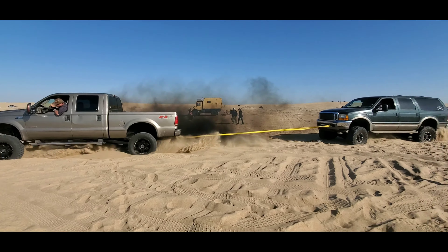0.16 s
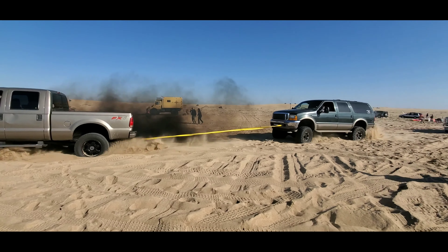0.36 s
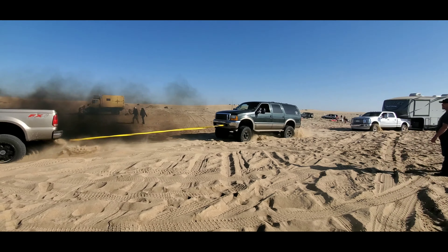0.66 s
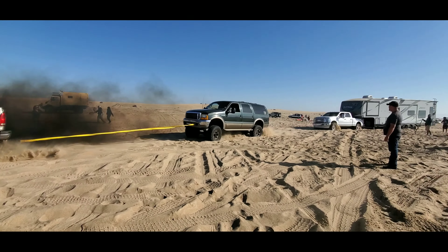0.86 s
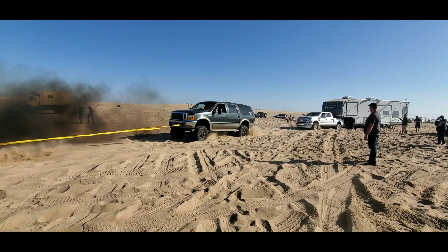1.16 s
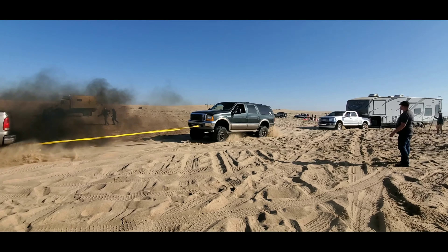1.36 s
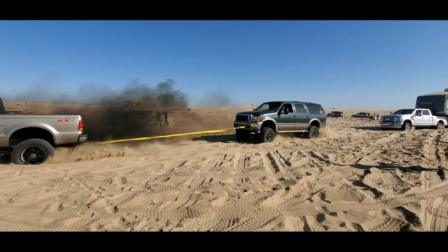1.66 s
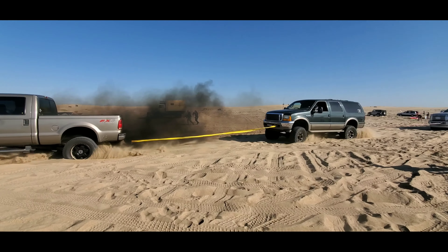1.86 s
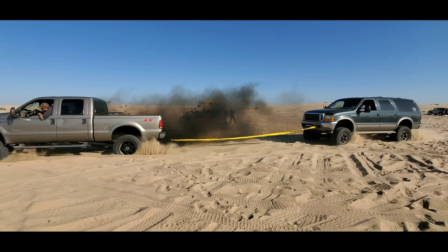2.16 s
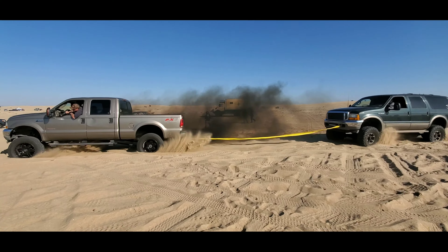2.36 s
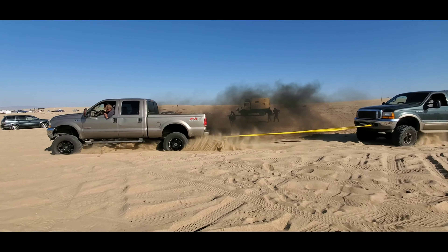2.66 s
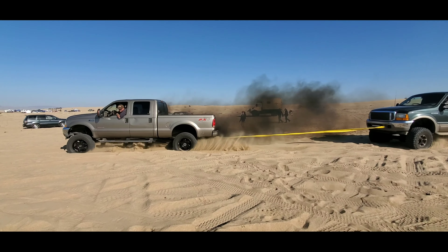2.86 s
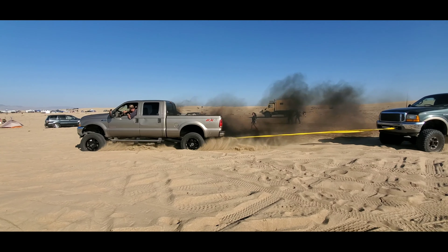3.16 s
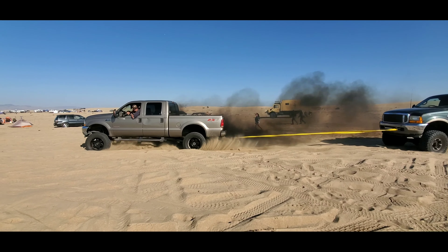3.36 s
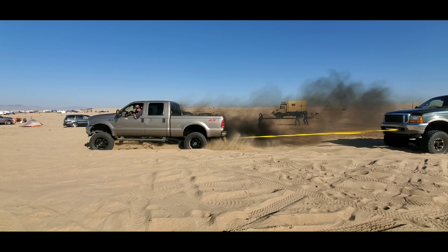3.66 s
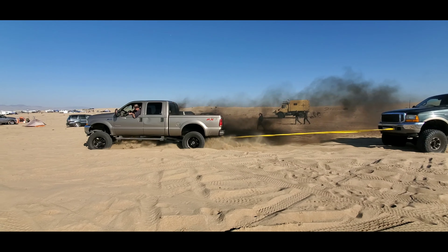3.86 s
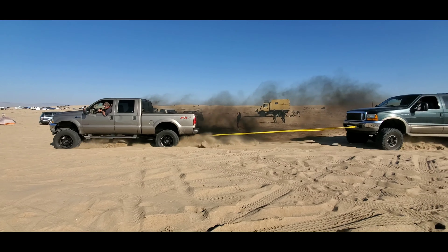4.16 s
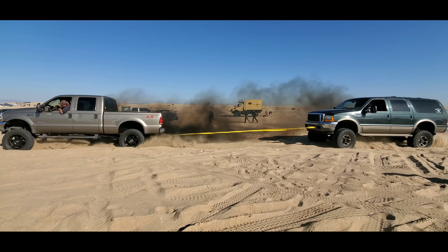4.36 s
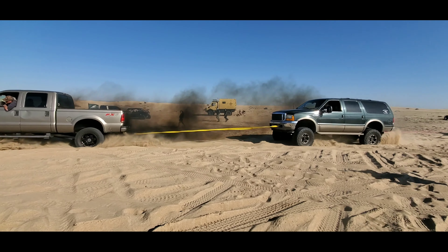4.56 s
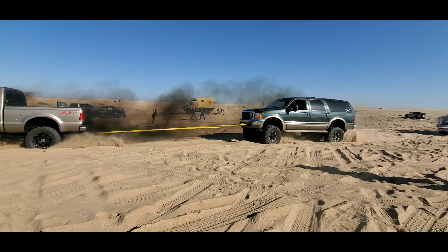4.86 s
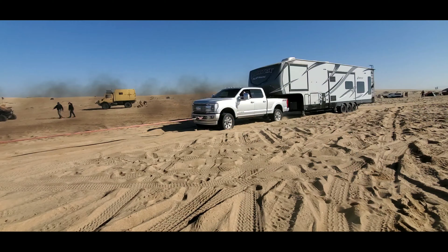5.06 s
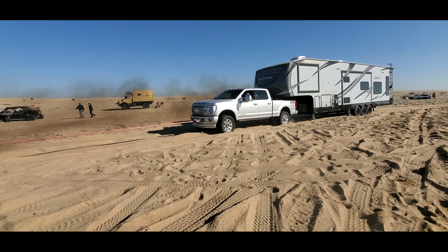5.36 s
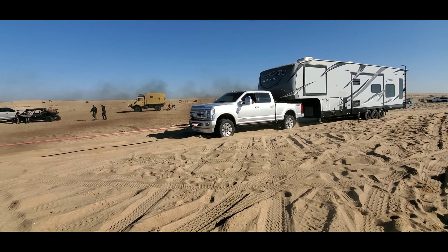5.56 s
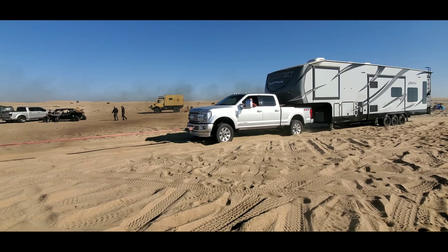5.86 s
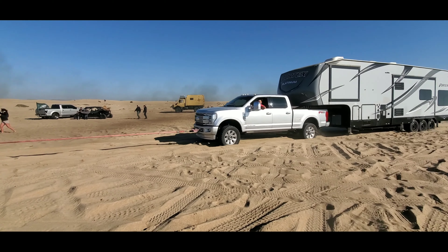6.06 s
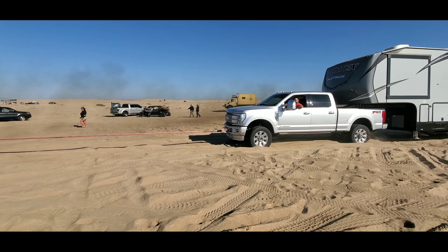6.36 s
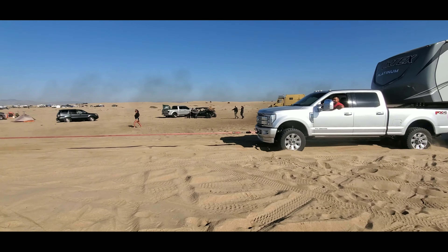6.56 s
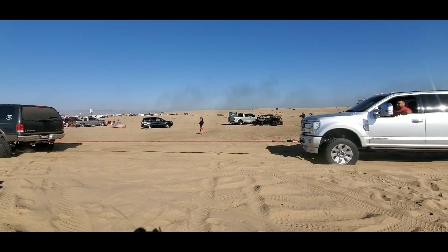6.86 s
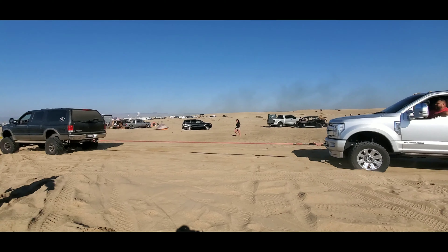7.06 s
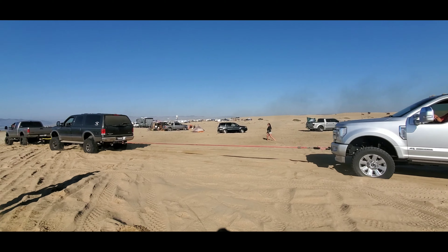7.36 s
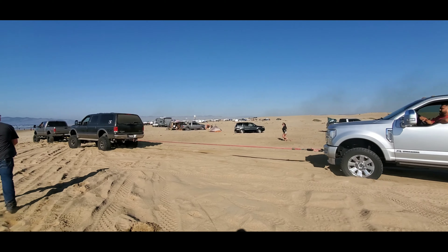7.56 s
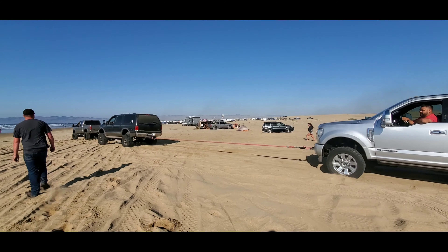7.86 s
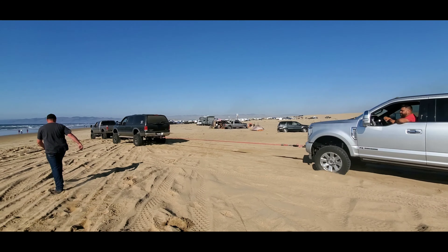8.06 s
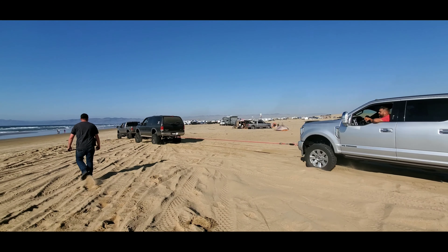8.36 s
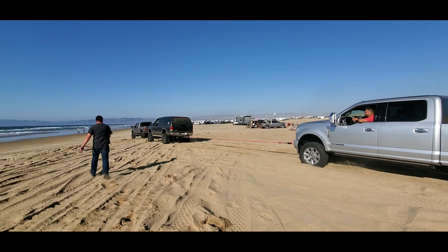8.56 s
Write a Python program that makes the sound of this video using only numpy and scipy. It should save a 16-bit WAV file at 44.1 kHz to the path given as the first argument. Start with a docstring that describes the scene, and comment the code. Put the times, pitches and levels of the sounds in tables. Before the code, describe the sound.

Outdoors with no room echo, a labouring diesel holds high revs, its buzzing exhaust note wavering and briefly dipping in strength near two seconds, with grainy clatter and sand noise. After five seconds a hard cut brings calm: deep wind buffets and snaps at the microphone, a faint wavering exhaust hum fades on the left, then a thin whistle, breathy downward swish and growing engine clatter on the right.

```python
"""A V8 diesel pickup revs hard on sand while towing, heard to the left of a panning hand-held phone.
Its harmonic orders, pulsed noise and ringing chuffs sound under filtered wind noise at the phone's two ports.
The sound cuts off, then a calmer scene fades in: gusts of lumpy noise, snaps and crackle on the ports,
a far truck's wavering two-partial drone and hiss that reach the left port first, and a nearer truck's clatter,
whistle and sliding breathy band, which rolls up on the right."""
import sys
import numpy as np
from scipy import signal
from scipy.fft import rfft, irfft, next_fast_len
from scipy.io import wavfile
from scipy.ndimage import uniform_filter1d, map_coordinates

SR = 44100
rng = np.random.default_rng(int(sys.argv[2]) if len(sys.argv) > 2 else 0)


def decibels_to_gain(level_db):
    """Convert a level in decibels to a linear amplitude gain (20 dB per decade)."""
    exponent = np.asarray(level_db, float) / 20
    return 10 ** exponent


def materialize(psi):
    """Save the field psi as 16-bit PCM at rate SR to the path in sys.argv[1].

    A 1-D psi becomes a single channel; in a 2-D psi each row is a channel.
    """
    bounded = np.clip(np.atleast_2d(psi).T, -1, 1)
    quanta = np.round(bounded * 32767).astype(np.int16)
    wavfile.write(sys.argv[1], SR, quanta)


N = 384552  # samples


# Engine speed and strength of the firing tone: time_s, cycle_rate_hz, firing_level_db
ENGINE_SPEED = [(0.0, 28.5, -15), (0.1, 27.5, -13), (0.24, 30.4, -17), (0.3, 30.7, -17), (0.51, 27.4, -11),
                (0.69, 31.3, -16), (0.92, 28.1, -13), (1.11, 30.7, -17), (1.3, 28.4, -10),
                (1.63, 30.5, -15), (1.77, 32.4, -16), (1.84, 32.5, -27), (2.0, 33.0, -25), (2.15, 28.3, -8),
                (2.35, 29.0, -11), (2.55, 28.1, -11), (2.75, 29.0, -14), (2.98, 28.3, -9),
                (3.17, 29.1, -13), (3.43, 28.7, -12), (3.66, 29.2, -14), (4.73, 28.9, -11),
                (4.93, 28.6, -8), (5.09, 28.7, -10)]
# Pickup's direction as the phone pans: time_s, left_port_lead_ms
BEARING = [(0, 0.34), (.6, 0.46), (1, 0.55), (1.35, 0.53), (1.8, .45), (2.4, .33), (2.8, .28), (3.9, 0.19),
           (4.3, 0.35), (4.7, .44), (5.1, 0.47)]


def pickup():
    """Source directivity: tone, clatter and chuff share one engine cycle and change as the tailpipe turns."""
    rate, firing_db = curves(ENGINE_SPEED)
    lead_ms, = curves(BEARING)
    # the tailpipe swings towards the phone as the lead falls below 0.33 ms
    facing = 1 / (1 + np.exp((lead_ms - 0.33) / 0.036))
    unsteady_rate = rate * (1 + 0.002 * wobble(25.6))
    cycle = 2 * np.pi * np.cumsum(unsteady_rate) / SR
    tone = engine_orders(cycle, rate, firing_db, facing)
    exhaust = ports(np.sqrt(2) * tone[None], 0.46 * lead_ms, 1, edge=0) * sides(0.088, -1.2)[:, None]
    echo_ms = 0.087 + 0.02 * facing
    noise = off_sand(clatter_and_spray(cycle, facing), echo_ms, share=0.42) + chuffs(cycle + 4.55)
    noise = ports(noise, lead_ms, alike=0.74, edge=0.24, blur_hz=7500)
    return exhaust + noise * sides(0.26, -2.1)[:, None]


# Orders excited by unequal cylinders: multiple_of_cycle_rate, relative_level_db
UNEVEN_ORDERS = [(1, -42), (2, -26.5), (3, -18), (4, -25.5), (5, -23.5), (6, -17), (7, -26), (8, 0),
                 (9, -21), (10, -14.5), (11, -12), (12, -21.5), (13, -17.5), (14, -19.5), (15, -40),
                 (16, -22), (17, -25.5), (18, -23), (19, -26), (20, -38.5), (21, -43), (22, -39), (23, -39),
                 (24, -36.5), (25, -53), (26, -33.5)]
# Pitches that the exhaust pipe favours: frequency_hz, gain_db
PIPE_RESONANCE = [(60, 0), (90, -6), (165, -8.5), (182, -11), (198, 7), (235, 2), (275, -14), (320, -2.5),
                  (360, 6), (405, -5), (455, 1.5), (490, -4.5), (535, -0.5), (575, -17), (630, -11)]


def engine_orders(cycle, rate, firing_db, facing):
    """Fourier series of the cycle: eight firings give the main order, unequal cylinders the others."""
    tone = decibels_to_gain(firing_db + 0.8 * wobble(30)) * np.sin(8 * cycle)
    third_db = firing_db - 11 - 9.5 * facing
    tone += decibels_to_gain(third_db + 1.2 * wobble(14)) * np.sin(3 * cycle)
    # the other orders follow only part of the firing level and fade by 0.83 dB per second
    uneven_db = -4.5 + 0.23 * firing_db - 4.5 * facing - 0.83 * np.arange(N) / SR
    upper_db = -1.5 + 20.5 * facing  # extra on the orders above the nineteenth
    for order, db in UNEVEN_ORDERS:
        if order in (3, 8):  # already sounded above
            continue
        drift = rng.uniform(0, 2 * np.pi) + 0.23 * wobble(12)
        pipe_db = along(PIPE_RESONANCE, order * rate)
        order_db = uneven_db + upper_db * (order > 19) + db + pipe_db
        tone += decibels_to_gain(order_db + 2.47 * wobble(9)) * np.sin(order * cycle + drift)
    return tone


# Spectrum of clatter and sand spray: frequency_hz, relative_density_db_per_hz
SPRAY_SPECTRUM = [(320, -13), (550, -2.5), (598, -24), (758, -9), (824, -8.5), (1020, -1.5), (1120, -14.5),
                  (1240, -0.5), (1360, -11), (1780, -5), (3470, -14), (6410, -14), (7690, -27),
                  (9890, -20.5), (15400, -28)]


def clatter_and_spray(cycle, facing):
    """Amplitude modulation: broadband noise pulses with the firings and twice a cycle."""
    knock = decibels_to_gain(0.51 * np.cos(8 * cycle) + 0.74 * np.cos(2 * cycle) + 0.65 * wobble(40))
    noise = coloured(knock * rng.standard_normal((3, N)), SPRAY_SPECTRUM)
    level_db = -31 - 0.5 * facing + 1.0 * wobble(3.15) + 1.07 * wobble(10)
    return decibels_to_gain(level_db) * patchy(noise, depth_db=1.5)


# Strength of the once-a-cycle chuff: time_s, level_db
CHUFF_LEVEL = [(0, -31.5), (.15, -32), (.25, -41), (.5, -34), (1.15, -47), (1.77, -28.5), (1.83, -57),
               (2.02, -51), (2.08, -30), (2.55, -34.5), (3.1, -35), (3.6, -38), (4.2, -35.5), (4.4, -38.5),
               (5.09, -35.5)]
# Resonances that each chuff excites: frequency_hz, relative_level_db, decay_by_60_db_s
CHUFF_RINGS = [(649, -3.5, 0.06), (765, -6, 0.083), (957, -1, 0.045), (1078, 4, 0.029), (1214, -3.5, 0.071),
               (1412, -1, 0.035), (1534, 2, 0.042), (1732, 2.5, 0.036)]
# Spectrum of the gas puff: frequency_hz, relative_density_db_per_hz
PUFF_SPECTRUM = [(400, -28), (700, 7), (1100, -7.5), (1500, 0), (2200, -7), (4000, -49)]


def chuffs(cycle):
    """Impulse response: one cylinder vents harder and excites the same ring once a cycle, with a gas puff."""
    chuff_db, = curves(CHUFF_LEVEL)
    level = decibels_to_gain(chuff_db + 2.9 * wobble(8))
    blows = np.diff(np.floor(cycle / (2 * np.pi)), prepend=0) * decibels_to_gain(2.2 * wobble(30))
    t = np.arange(4096) / SR
    ring = sum(decibels_to_gain(db - 60 * t / t60) * np.sin(2 * np.pi * hz * t) for hz, db, t60 in CHUFF_RINGS)
    ring = ring * (1 - np.exp(-t / 0.0025))  # soft onset
    puff = np.exp(1.8 * np.cos(cycle - 0.9)) * rng.standard_normal((3, N))
    ringing = unit(signal.fftconvolve(blows, ring)[:N])
    return level * (ringing + decibels_to_gain(-13.5) * coloured(puff, PUFF_SPECTRUM))


def off_sand(x, echo_ms, share):
    """Comb filtering: x and its delayed echo off the ground interfere, hollowing out one band."""
    hz, t, z = signal.stft(x, SR, nperseg=512)
    delay_s = np.interp(t * SR, np.arange(N), echo_ms) / 1000
    echo = share * np.exp(-2j * np.pi * hz[:, None] * delay_s)
    return signal.istft(z * (1 + echo), SR, nperseg=512)[1][:, :N]


# Wind while towing: time_s, strength_db
BREEZE_STRENGTH = [(0, -20.5), (.15, -24.5), (.4, -29.5), (.65, -38), (1.3, -30.5), (1.79, -23.5),
                   (2.3, -25.5), (2.48, -20.5), (2.7, -26), (3.08, -24), (4.27, -23.5), (4.45, -31),
                   (4.9, -36), (5.09, -31)]
# Low wind buffeting, in breeze and gusts alike: frequency_hz, relative_density_db_per_hz
BUFFET_SPECTRUM = [(20, -20), (40, -7.5), (65, -2.5), (90, 1), (130, -8), (200, -12.5), (350, -28),
                   (700, -57)]
# Flutter while towing: frequency_hz, relative_density_db_per_hz
DRAUGHT_SPECTRUM = [(100, -8), (160, -2), (300, -5), (600, -19), (1200, -28.5), (2500, -54)]


def breeze():
    """Turbulent pressure: buffeting wanders between the ports, and its flutter grows faster than it does."""
    db, = curves(BREEZE_STRENGTH)
    pan_db = 4.2 * wobble(11)
    flutter_db = 13 + 1.473 * db + 3.2 * wobble(10.5)
    buffet = turbulence(BUFFET_SPECTRUM, lumpy_db=-1.0, rate=14, alike=0.59)
    flutter = turbulence(DRAUGHT_SPECTRUM, lumpy_db=2.5, rate=35, alike=0.51)
    return sides(db + 3 * wobble(11), pan_db) * buffet + sides(flutter_db, pan_db * 0.25) * flutter


# Gusts after the towing: middle_s, width_at_half_power_s, buffet_level_db, flutter_level_db,
# left_over_right_db (the flutter takes a share of this)
GUSTS = [(5.376, 0.086, -19.5, -35, 16), (5.565, 0.058, -12.5, -28, 25), (5.647, 0.096, -14.5, -36, 19),
         (6.04, 0.11, -21.5, -30, -3), (6.3, .08, -31, -25.5, -5), (6.47, 0.041, -24.5, -43, -1),
         (6.725, 0.091, -26.5, -42, 3), (6.95, 0.12, -22.5, -28, -0.5), (7.14, .05, -31, -36, -2),
         (7.389, .07, -19.5, -36, -2), (7.678, 0.034, -32, -39, -13), (7.95, 0.11, -28, -38, -23),
         (8.116, 0.042, -28, -29.5, -4), (8.246, 0.058, -20.5, -38, -1), (8.528, 0.076, -24, -19.5, -13)]
# Spiky flutter above the buffeting: frequency_hz, relative_density_db_per_hz
FLUTTER_SPECTRUM = [(120, 3.5), (250, 2.5), (500, -6.5), (1000, -21), (2000, -34), (4000, -54)]


def gusts():
    """Turbulent pressure in swells: low buffeting and a spiky flutter rise together over a calm wind."""
    s, length, low_db, high_db, pan_db = np.transpose(GUSTS)
    low = turbulence(BUFFET_SPECTRUM, lumpy_db=0.0, rate=35, alike=0.38)
    local_power = uniform_filter1d(low ** 2, size=1300, axis=1)
    low = unit(low / (1.0 + np.sqrt(np.abs(local_power))))  # a gust pushes steadily while it lasts
    calm_low = sides(-31.5 + 2.7 * wobble(12), -7 + 6 * wobble(9.8))
    low = swells(s, length, low_db, pan_db, calm_low) * low
    calm_high = sides(-33.5 + 2.9 * wobble(18), 3 + 3 * wobble(5.6))
    high = swells(s, length, high_db, 5 + 0.29 * pan_db, calm_high)
    high = high * turbulence(FLUTTER_SPECTRUM, lumpy_db=4.0, rate=55, alike=0.28)
    return low + high


def swells(s, length, db, pan_db, calm):
    """Power addition: bell-shaped gusts, each with its own left-right balance, over a calm level."""
    bells = np.exp(-np.log(16) * ((np.arange(N) / SR - s[:, None]) / length[:, None]) ** 2)
    return np.sqrt(sides(db, pan_db) ** 2 @ bells + calm ** 2)


# Eddies snapping at a port: start_s, level_db, left_over_right_db
SNAPS = [(5.358, -15.5, 16), (5.42, -26, 4), (5.439, -19, 14), (5.545, -15, 19), (5.624, -22, 4),
         (5.722, -24, 19), (6.675, -25, 4), (6.925, -20.5, 5), (6.97, -13, 2), (7.016, -27, -2),
         (7.201, -25, -12), (7.414, -17.5, 1), (7.565, -37, 4), (7.954, -26, 11), (8.472, -20.5, 3),
         (8.516, -16, -2), (8.555, -22, -17)]
# Spectrum of a snap: frequency_hz, relative_density_db_per_hz
SNAP_SPECTRUM = [(200, -4), (500, 5), (1200, -10), (2200, -30), (4000, -40)]


def eddy_snaps():
    """Transient bursts: each eddy gates noise with a fast rise and an exponential decay."""
    s, db, pan_db = np.transpose(SNAPS)
    bursts = np.zeros((2, N))
    bursts[:, np.round(s * SR).astype(int)] = sides(db, pan_db)
    t = np.arange(1024)[None] / SR
    envelope = decibels_to_gain(-60 * t / 0.023) * (1 - np.exp(-t / 0.0012))  # falls 60 dB in 23 ms
    bursts = signal.fftconvolve(bursts, envelope, axes=1)[:, :N]
    return bursts * coloured(rng.standard_normal((2, N)), SNAP_SPECTRUM)


# Air crackling, mostly at the left port: time_s, level_db
CRACKLE_LEVEL = [(5.8, -58), (5.93, -36), (6.1, -42.5), (6.35, -39.5), (6.56, -44.5), (6.7, -67)]
# Spectrum of the crackle: frequency_hz, relative_density_db_per_hz
CRACKLE_SPECTRUM = [(500, 6), (1000, 4.5), (2000, -2), (4000, -12.5), (6500, -31), (8000, -49)]


def crackle():
    """Intermittent turbulence: rapid, deep level swings make the noise crackle."""
    level = decibels_to_gain(curves(CRACKLE_LEVEL)[0] + 1.4 * wobble(9)) * sides(0, 11.0)[:, None]
    return level * turbulence(CRACKLE_SPECTRUM, lumpy_db=4.5, rate=190, alike=0.27)


# Noise of the two trucks: time_s, far_level_db, near_level_db
TRUCK_LEVELS = [(5.2, -41.5, -50), (5.6, -44, -47), (6.4, -54.5, -47.5), (7.1, -53, -40), (7.7, -52, -39.5),
                (8.2, -58, -34.5), (8.72, -57, -36)]
# Far truck's hiss: frequency_hz, relative_density_db_per_hz
FAR_SPECTRUM = [(290, -40), (500, -12.5), (826, -8.5), (996, -32), (1130, -15.5), (1650, -25), (1900, -15),
                (2290, -24.5), (2460, -25), (4240, -24), (15400, -52)]
# Near truck's clatter: frequency_hz, relative_density_db_per_hz
NEAR_SPECTRUM = [(290, -34), (500, -12), (666, -12), (726, -2.5), (815, -3), (1180, -18.5), (1450, -12),
                 (1670, -16), (2290, -13.5), (3190, -18), (3890, -26), (5340, -26.5), (8330, -36.5),
                 (11800, -30.5), (15400, -48)]


def truck_noise():
    """Interaural delay: far hiss leads at the left port; close, labouring clatter leads at the right."""
    far_db, near_db = curves(TRUCK_LEVELS)
    hiss = patchy(coloured(rng.standard_normal((3, N)), FAR_SPECTRUM), depth_db=3.5)
    far = decibels_to_gain(far_db + 2.0 * wobble(3.08)) * hiss
    far = ports(far, lead_ms=0.476, alike=0.83, edge=0.2) * sides(0, -12)[:, None]
    clatter = decibels_to_gain(1.43 * wobble(150)) * rng.standard_normal((3, N))
    near = decibels_to_gain(near_db + 0.18 * wobble(13)) * patchy(coloured(clatter, NEAR_SPECTRUM), depth_db=3)
    near = ports(near, lead_ms=-0.48, alike=0.2, edge=0.24) * sides(0, -0.96)[:, None]
    return far + near


# Far truck's exhaust note: time_s, pitch_hz, level_db
DRONE = [(5.15, 195.6, -27), (5.3, 171.1, -29.5), (5.43, 155.2, -32), (5.58, 182, -29), (5.72, 200.2, -34),
         (5.9, 186.4, -29), (6.05, 178, -35.5), (6.3, 200, -36.5), (6.9, 200, -46), (7.3, 201, -35),
         (7.55, 197.6, -41), (7.7, 197, -36), (8, 188, -38.5), (8.4, 190, -39), (8.72, 194, -41)]


def exhaust_drone():
    """Frequency modulation: the far exhaust's fundamental and octave waver in pitch and level together."""
    hz, db = curves(DRONE)
    phase = 2 * np.pi * np.cumsum(hz * (1 + 0.0081 * wobble(20))) / SR
    partials = np.sqrt(2) * np.sin(phase) + decibels_to_gain(-10.0) * np.sin(2 * phase)
    note = decibels_to_gain(db + 2.4 * wobble(18) + 2.0 * wobble(6)) * partials
    return ports(note[None], 0.3, 1, edge=0)


# Breathy band from the near truck, sliding down: time_s, centre_hz, level_db
SWISH = [(6.6, 3080, -70), (6.8, 2923, -60), (7.05, 2750, -46), (7.2, 2550, -53), (7.4, 2260, -47),
         (7.6, 2273, -65), (7.8, 2234, -70)]
# Near truck's turbo: time_s, pitch_hz, level_db
WHISTLE = [(6.48, 3620, -80), (6.54, 3660, -59), (6.75, 3700, -62), (7.1, 3700, -60), (7.4, 3680, -73)]


def turbo_whine():
    """Narrowband modulation: slow noise on a gliding carrier makes the breath, a jittered sine the whistle."""
    hz, db = curves(SWISH)
    breath = np.array([unit(wobble(300)), unit(wobble(300))])
    swish = decibels_to_gain(db) * breath * np.sin(2 * np.pi * np.cumsum(hz) / SR)
    hz, db = curves(WHISTLE)
    phase = 2 * np.pi * np.cumsum(hz * (1 + 0.0026 * wobble(60))) / SR
    whistle = decibels_to_gain(db + 2.5 * wobble(40)) * np.sin(phase)
    whistle = ports(whistle[None], -0.465, 1, edge=0) * sides(0, -12)[:, None]
    return np.sqrt(2) * (swish + whistle)


def turbulence(spectrum, lumpy_db, rate, alike):
    """Partial coherence: lumpy noise of each port's own, plus a share common to both."""
    lumps = decibels_to_gain(lumpy_db * np.array([wobble(rate) for _ in range(3)]))
    left, right, both = lumps * rng.standard_normal((3, N))
    return coloured(np.array([left, right]) + alike * both, spectrum)


def ports(x, lead_ms, alike, edge, blur_hz=5000):
    """Delay and diffraction: left hears x first, right adds an inverted edge wave; extra rows are diffuse."""
    hz, t, z = signal.stft(x, SR, nperseg=512)
    hz = hz[:, None]
    lead_s = np.interp(t * SR, np.arange(N), lead_ms + np.zeros(N)) / 1000
    turn = np.exp(1j * np.pi * hz * lead_s)  # half of the lead for each port
    shadow = (1 - edge * np.exp(-2j * np.pi * hz * 0.00017)) / np.sqrt(1 + edge ** 2)
    pair = np.array([z[0] * turn, z[0] / turn * shadow])
    if len(z) > 1:
        share = np.clip(alike, 0, 1) / (1 + (hz / blur_hz) ** 2)  # the treble arrives scattered
        pair = np.sqrt(share) * pair + np.sqrt(1 - share) * z[1:]
    return signal.istft(pair, SR, nperseg=512)[1][:, :N]


def patchy(x, depth_db):
    """Scintillation: random patches of gain over time and pitch, as from air that eddies along the path."""
    z = signal.stft(x, nperseg=512)[2]
    field = uniform_filter1d(rng.standard_normal(z.shape[1:]), size=3, axis=0)
    field = uniform_filter1d(field, size=10, axis=1)
    return unit(signal.istft(z * decibels_to_gain(depth_db * unit(field)), nperseg=512)[1][:, :N])


def sides(db, pan_db):
    """Constant-power panning: left and right gains whose summed power does not depend on the balance."""
    pair = decibels_to_gain(np.array([pan_db, -pan_db]) / 2)
    return decibels_to_gain(db) * pair / np.sqrt(np.mean(pair ** 2, axis=0))


def coloured(x, spectrum):
    """Spectral filtering: x through a spectrum that closes steeply at both ends, scaled to rms 1."""
    m = next_fast_len(N + 8192)
    hz = np.fft.rfftfreq(m, 1 / SR)
    closed = [(spectrum[0][0] / 2, -90), *spectrum, (spectrum[-1][0] * 2, -90)]
    return unit(irfft(rfft(x, m) * decibels_to_gain(along(closed, hz)), m)[..., :N])


def along(points, hz):
    """Logarithmic frequency scale: interpolates (frequency_hz, level_db) points."""
    f, v = np.transpose(points)
    return np.interp(np.log(hz + 1), np.log(f + 1), v)


def wobble(rate):
    """Band-limited fluctuation: a smooth random curve with rate knots a second."""
    knots = rng.standard_normal(int(N * rate / SR) + 4)
    return map_coordinates(knots, [np.arange(N) * rate / SR])


def curves(rows):
    """Linear interpolation: one value per sample for each column after the time."""
    s, *cols = np.transpose(rows)
    return [np.interp(np.arange(N) / SR, s, c) for c in cols]


def unit(x):
    """Power normalisation: scales x to rms 1."""
    return x / np.sqrt(np.mean(x ** 2) + 1e-20)


# Cut at the end of the towing: time_s, gain_db
CUT = [(5.0991, 0), (5.0993, -30), (5.112, -42), (5.126, -66), (5.14, -120)]
# Fade-in of the calm scene: time_s, gain_db
FADE = [(5.125, -120), (5.14, -50), (5.155, -15), (5.2, -7.5), (5.3, 2)]


def scene():
    """Superposition: the towing sources are cut off, then the calm scene's sources fade in."""
    towing = pickup() + breeze()
    calm = gusts() + eddy_snaps() + crackle() + truck_noise() + exhaust_drone() + turbo_whine()
    return decibels_to_gain(curves(CUT)[0]) * towing + decibels_to_gain(curves(FADE)[0]) * calm


def low_pass(x):
    """Removes everything above the highest recorded frequency."""
    return signal.sosfilt(signal.butter(12, 15600, fs=SR, output="sos"), x)


def record(dry):
    """Nonlinear saturation: peaks round off softly towards a ceiling of 1.02."""
    soft = dry / (1 + np.abs(dry / 1.02) ** 4) ** (1 / 4)
    return low_pass(soft)


dry = scene()
out = record(dry)
materialize(out)
```